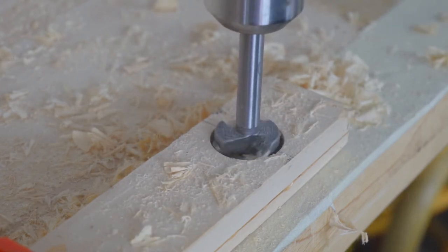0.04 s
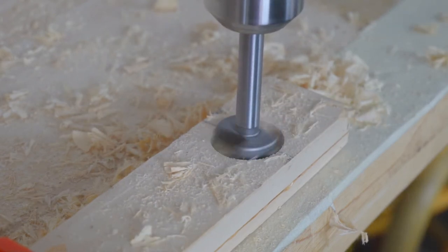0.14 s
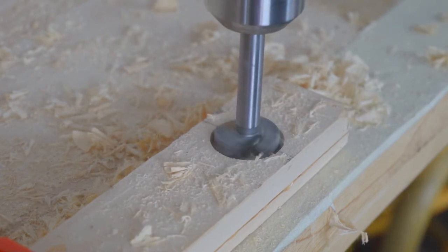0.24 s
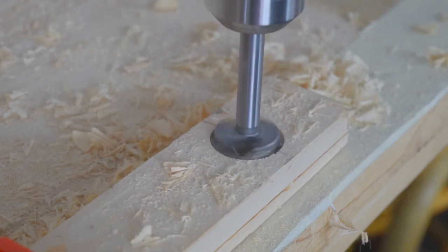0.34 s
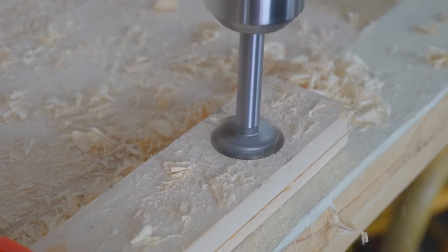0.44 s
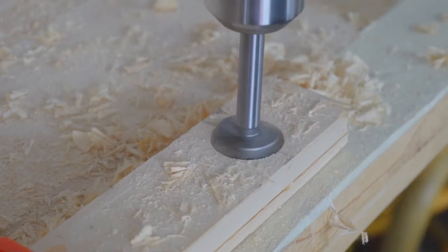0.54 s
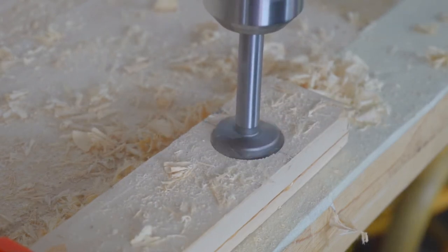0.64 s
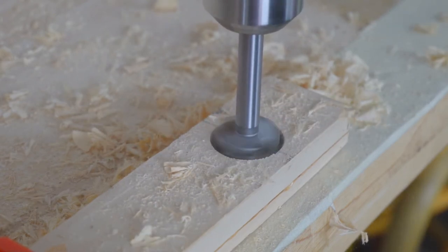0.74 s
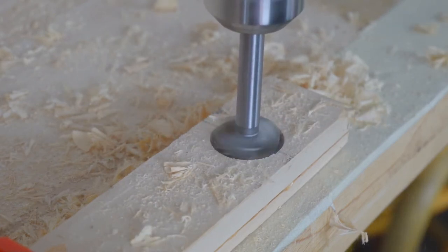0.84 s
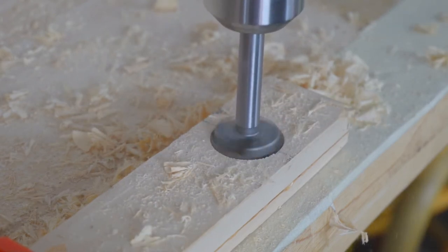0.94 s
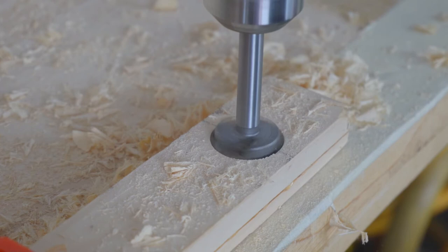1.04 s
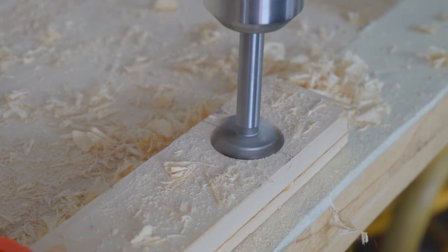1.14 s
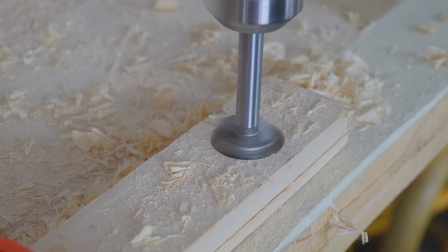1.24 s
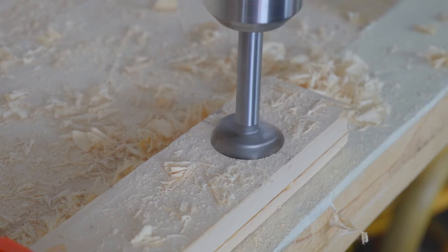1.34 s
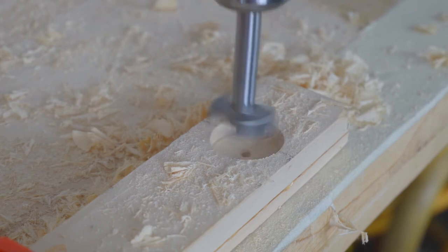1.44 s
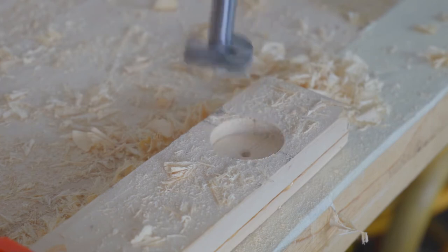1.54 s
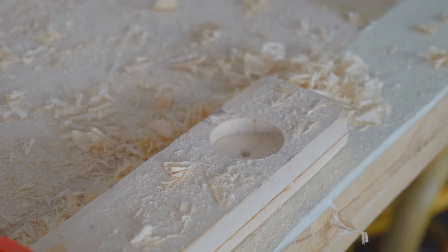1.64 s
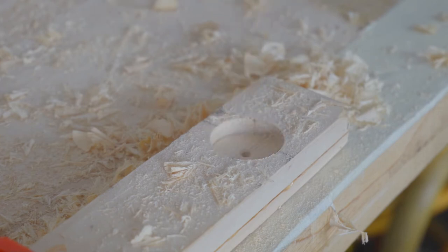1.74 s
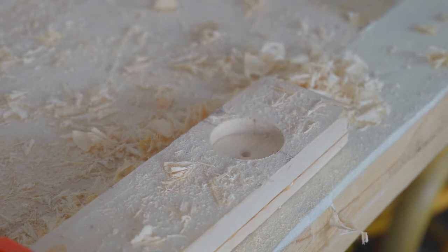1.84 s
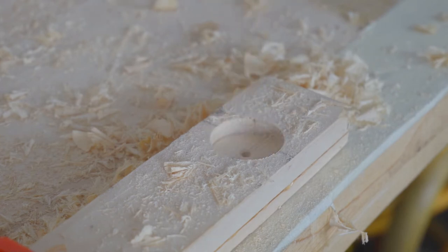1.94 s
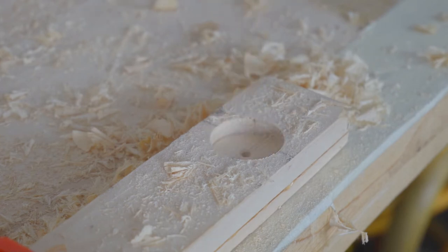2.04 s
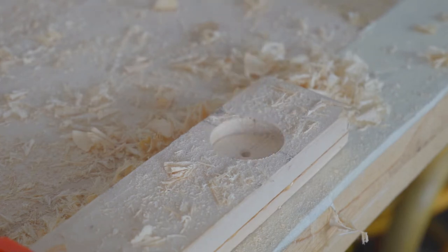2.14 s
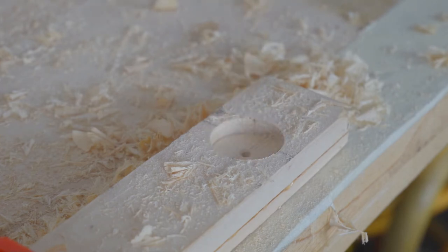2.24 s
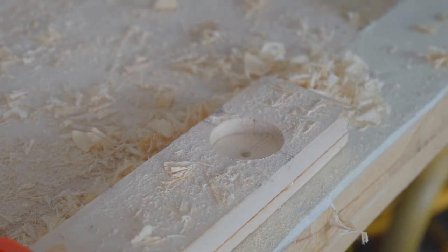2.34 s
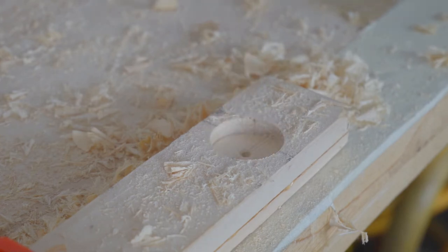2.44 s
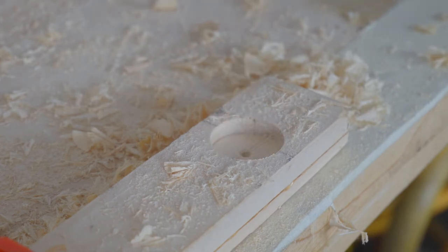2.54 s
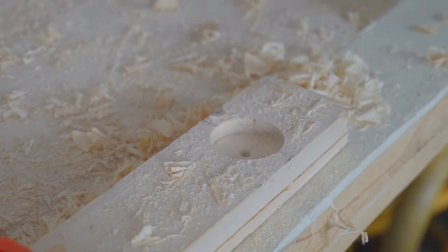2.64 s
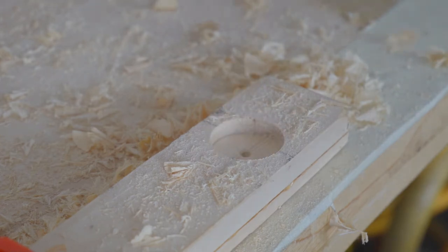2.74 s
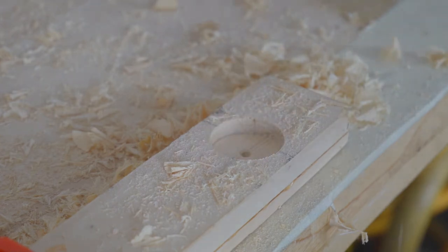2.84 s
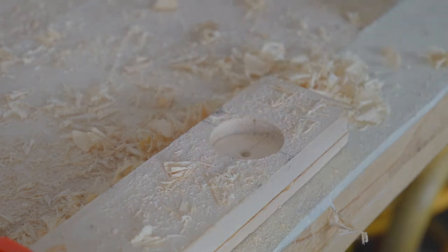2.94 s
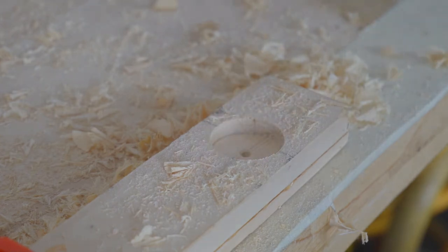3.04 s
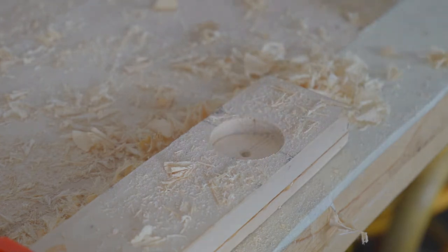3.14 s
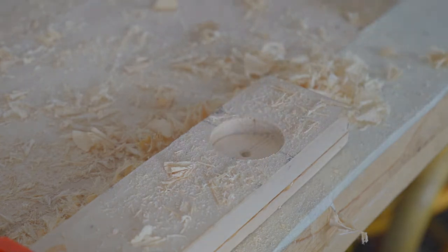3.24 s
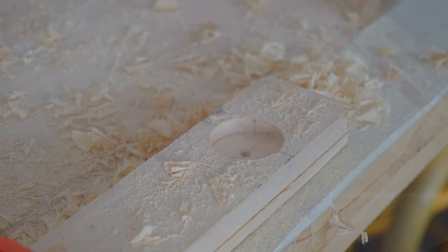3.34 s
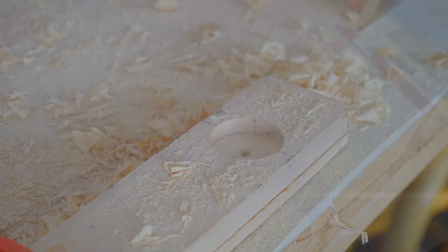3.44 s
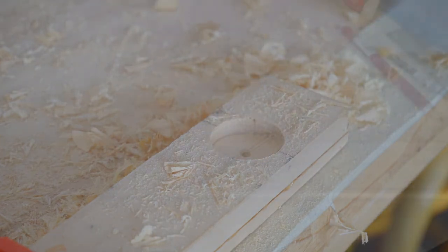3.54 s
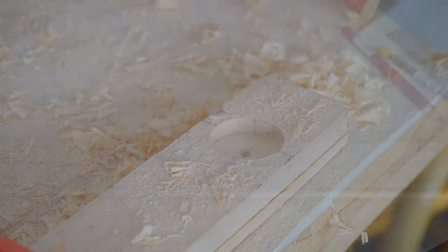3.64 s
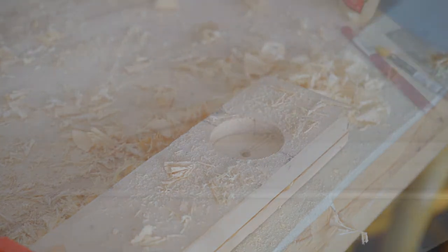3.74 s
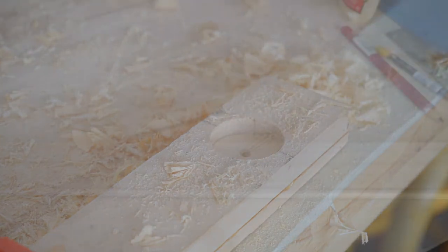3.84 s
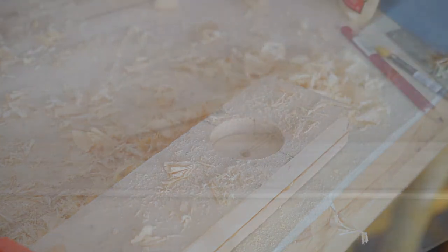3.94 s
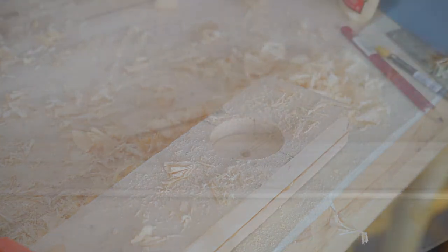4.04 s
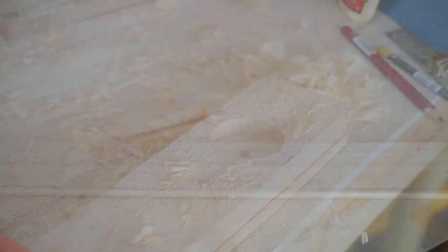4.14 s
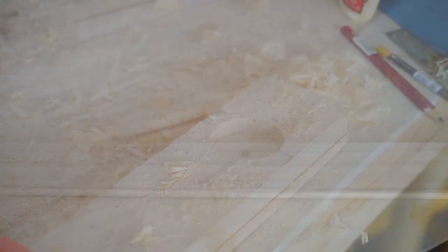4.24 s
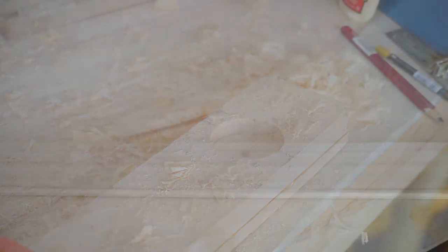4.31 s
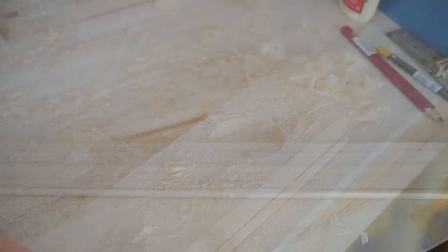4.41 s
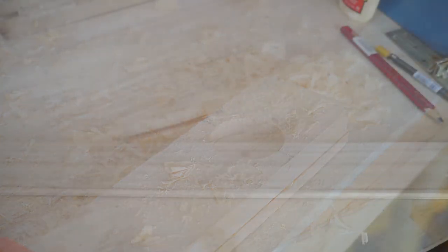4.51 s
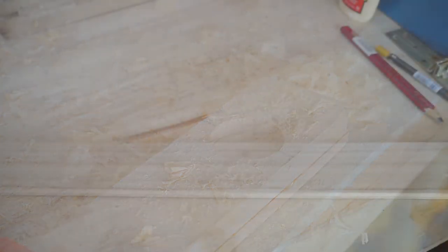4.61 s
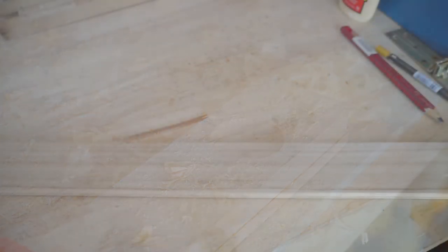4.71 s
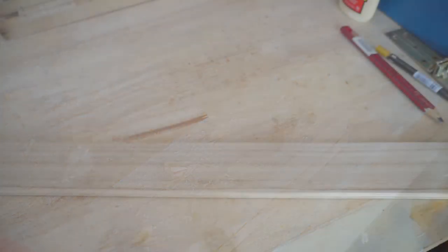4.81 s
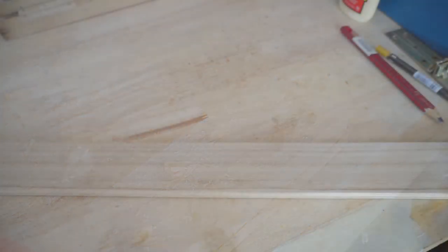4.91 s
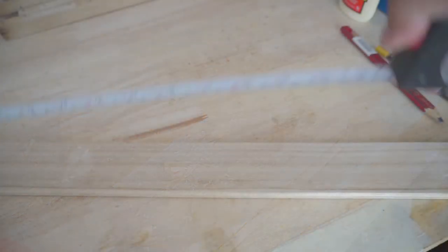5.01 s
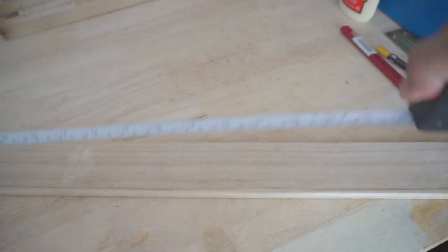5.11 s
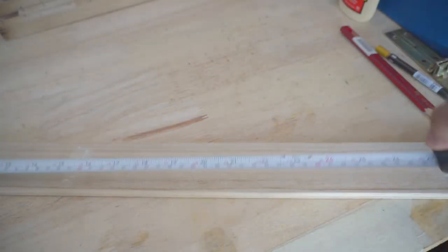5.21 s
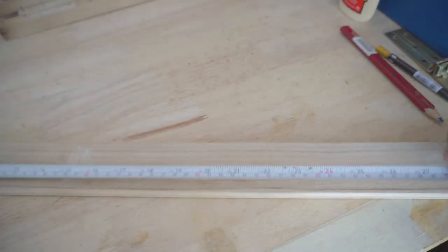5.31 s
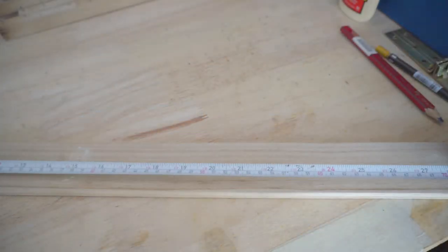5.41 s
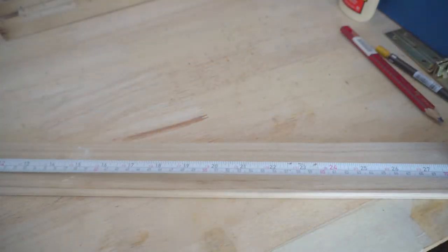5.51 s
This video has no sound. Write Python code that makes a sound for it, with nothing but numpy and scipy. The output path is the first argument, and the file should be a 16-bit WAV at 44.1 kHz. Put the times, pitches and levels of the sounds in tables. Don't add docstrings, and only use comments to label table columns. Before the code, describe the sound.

A close, dry stereo scene in a small workshop. From 0 s a corded drill spins up, its gear whine rising; at about 0.1 s the bit bites and by 0.4 s it bores at full pressure, loud and harsh, with torn wood fibres, gritty gear rattle, a fast hundred-per-second buzz and irregular knocks as the cutter catches. At about 1.45 s the trigger is released: the cutting stops and the whine, rattle and airy fan hiss slide down in pitch and fade until about 3.2 s. Hard wooden knocks with scraping come at 3.02-3.12, 3.24 and 3.46-3.5 s, then faint nudges. A very brief silence at 4.12 s cuts to a quiet, soft hum with a small rustle. From about 4.5 s a steel tape rubs, rattles, chirps and snaps brightly, densest at 4.6-5.0 s, with looser clacks to 5.27 s and faint ticks near 5.5 s.

```python
import sys
import numpy as np
from scipy import signal
from scipy.fft import rfft, irfft, next_fast_len
from scipy.io import wavfile

SR = 44100
rng = np.random.default_rng(int(sys.argv[2]) if len(sys.argv) > 2 else 0)


def invert_db(level):
    return 10 ** (np.asarray(level, dtype=float) / 20)


def store_wav(level_fs):
    pcm = np.round(np.clip(np.atleast_2d(level_fs), -1, 1) * 32767)
    wavfile.write(sys.argv[1], SR, pcm.T.astype(np.int16))


N = 245637

BITE_S, PRESSED_S, RELEASE_S, LAID_S = 0.11, 0.42, 1.444, 3.14
SILENT_FROM_S, SILENT_TO_S = 4.1238, 4.1645
MAINS_HZ, FIRST_JOLT_S, LAST_JOLT_S = 50, .1735, 1.42

# (frequency [Hz], side minus mid [dB])
SIDE_LEVEL = [(60, -18), (110, -22), (200, -22), (380, -17.5), (700, -12), (1290, -9), (2380, -8.5),
              (4400, -7), (8120, -5.5), (15000, -3.5)]
# (time [s], left minus right [dB])
DRILL_PAN = [(0, 0.5), (1.3, -0.1), (1.75, -1), (2.25, -2), (2.75, -.4), (3.2, .3)]
# (time [s], left minus right [dB])
TAPE_DIRECTION = [(4.17, 1.0), (4.45, 0.5), (4.474, -2.5), (4.644, 0), (4.934, -4.5), (5.338, 0.0),
                  (5.57, -1)]

# (time [s], level [dB])
HUM_LEVEL = [(2.9, -45), (3.49, -40), (3.654, -45.5), (3.918, -49), (4.165, -51), (4.445, -49),
             (5.57, -44.5)]
# (frequency [Hz], level [dB])
HUM_SPECTRUM = [(18, -92), (30, -65.5), (81, -22), (164, -21.5), (270, -2), (332, -6.5), (379, -5),
                (897, 0), (1200, -1.5), (1910, -12.5), (4420, -26), (4780, -27), (5170, -27.5),
                (15500, -55)]
# (frequency [Hz], level [dB rms])
LOW_TONES = [(91.5, -67.5), (274.5, -90)]

# (frequency [Hz], width [Hz], level [dB])
BLADE_MODES = [(1910, 350, -5.5), (2540, 120, -7), (3410, 54, -9), (5000, 150, -27), (5310, 48, -17),
               (6070, 48, 5), (8720, 42, -16)]
# (frequency [Hz], level [dB])
BLADE_LOW_SPECTRUM = [(900, -10.5), (1500, -6.5), (2200, -6), (3500, -8), (5000, -10.5), (7000, -27.5)]
# (frequency [Hz], level [dB])
BLADE_HIGH_SPECTRUM = [(3500, -25), (5000, -1.5), (7500, -1.5), (10000, -8.5), (13000, -12), (15800, -11)]
# (time [s], level [dB], treble [dB], rise [s], fall [s])
BLADE_JERKS = [(4.168, -53, 0, 0.012, 0.25), (4.215, -40.5, 2.5, 0.011, 0.063), (4.25, -50, -2, .03, 0.14),
               (4.664, -32, -0.5, 0.091, 0.061), (4.696, -37, 1.5, 0.038, 0.26), (4.81, -40, -2, .03, 0.15),
               (4.862, -39, -1, 0.028, 0.22), (4.95, -37.5, -11, 0.077, 0.28),
               (5.02, -45.5, -4.5, 0.28, 0.099), (5.155, -44.5, -4.5, 0.38, 0.14), (5.2, -53.5, -7, .6, .9),
               (5.268, -52, -6.5, .015, 1.4)]
# (time [s], peak [dB], ring [Hz], upper ring [dB])
BLADE_SNAPS = [(4.2137, -32, 2270, -19), (4.4748, -45, 1490, 6), (4.5365, -35, 1800, -10),
               (4.608, -31, 2030, -10), (4.6515, -22, 2590, 1), (4.661, -25, 1650, 2),
               (4.6887, -21, 2540, 2), (4.7114, -28, 2030, 4), (4.771, -30, 1810, -4),
               (4.8026, -25, 2090, -15), (4.812, -26, 1910, 0), (4.857, -39, 1910, 11),
               (4.94, -32, 1650, -16), (4.954, -27, 1420, -22), (4.9678, -25, 2650, -16),
               (5.012, -28.5, 1830, -6), (5.104, -38, 1260, -8), (5.1316, -34, 2350, -5),
               (5.266, -38, 1500, -7)]
# (time [s], peak [dB])
SETTLING_TICKS = [
    (4.9709, -30),
    (5.1375, -38),
    (5.2662, -42),
    (5.4982, -48),
    (5.5515, -49),
]
# (start [s], end [s], pitch [Hz], level [dB])
BLADE_SQUEALS = [(4.597, 4.63, 2025, -41), (4.644, 4.667, 2640, -41), (4.688, 4.706, 2594, -36),
                 (4.801, 4.825, 1998, -34), (4.85, 4.875, 5100, -44), (4.692, 4.706, 5250, -35),
                 (4.657, 4.674, 6200, -41), (4.715, 4.735, 9700, -50), (4.89, 4.94, 7500, -59),
                 (4.938, 4.95, 1370, -41), (4.963, 4.982, 1410, -43)]
# (multiple of the pitch, level [dB])
SQUEAL_OVERTONES = [(1, -0.5), (2, -16), (3, -11)]

# (time [s], crack peak [dB], bench thud [dB], crack pitch [Hz])
BENCH_KNOCKS = [(3.0231, -5, -20.5, 2370), (3.0328, -21, -23, 1650), (3.0915, -15.5, -28.5, 1580),
                (3.1166, -18, -31, 2050), (3.1978, -29, -51, 3440), (3.238, -7.5, -37, 2290),
                (3.259, -24, -40, 1990), (3.4602, -33, -35, 2750), (3.4654, -25, -30, 2130),
                (3.4748, -18, -47, 2020), (3.4835, -7, -32.5, 2420), (3.4861, -16, -32, 2430),
                (3.4905, -31, -33.5, 2520), (3.5259, -35, -32.5, 1510), (3.6552, -52, -48, 1760),
                (3.8665, -51.5, -66, 2020), (3.96, -40, -55, 1735), (4.068, -44, -62, 1740)]
# (time [s], level [dB])
BIT_TICKS = [
    (3.2377, -34),
    (3.2687, -37),
]
# (frequency [Hz], level [dB], T60 [s])
BENCH_MODES = [(430, 0.5, 0.042), (497, -4, 0.038), (644, -1, 0.038), (743, -4.5, 0.066),
               (798, -4.5, 0.095), (920, -9, 0.1), (997, -16, 0.069), (1170, -12, 0.066),
               (1535, -11, 0.069)]
# (time [s], level [dB])
WEIGHT_THUMPS = [
    (3.0225, -28),
    (3.0432, -34),
    (3.0846, -35),
    (3.1053, -36),
    (3.2385, -37),
    (3.2592, -41),
    (3.4206, -50),
    (3.462, -32),
    (3.4827, -37),
    (3.524, -43),
]
# (frequency [Hz], level [dB], T60 [s])
BENDING_MODES = [(144.5, -4, 0.23), (248, -4, 0.2), (296, -8, 0.13)]
# (time [s], level [dB], rise [s], fall [s])
SLIDE_STROKES = [
    (3.038, -25.5, 0.0066, 0.091),
    (3.094, -30.5, 0.016, 0.13),
    (3.2, -43.5, 0.39, 0.4),
    (3.27, -45.5, .01, 0.4),
    (3.49, -33, 0.053, 0.053),
    (3.607, -40, 0.18, 0.096),
    (3.87, -60, .03, 0.12),
    (3.966, -65, .06, .2),
    (4.066, -66, .01, 0.15),
]
# (frequency [Hz], level [dB])
SLIDE_SPECTRUM = [(600, -24), (1500, -7.5), (3000, -4.5), (6500, -10.5), (9000, -23), (15500, -28)]

# (time [s], rate [Hz])
MESH_RATE = [(0, 1580), (.22, 2970), (.42, 4270), (.56, 4580), (1.0, 4530), (1.42, 4570), (1.616, 4065),
             (1.8, 3675), (2.35, 2450), (2.7, 1690), (3.3, 620)]
# (multiple of the mesh rate, level [dB])
MESH_ORDERS = [(1, 0), (2, -1), (3, -2.5), (4, -8), (5, -8), (6, -12), (7, -18), (8, -22)]
# (start [s], end [s], level [dB], rise [s], fall [s])
MESH_WHINES = [
    (.1, .225, -33, .15, .15),
    (.26, .42, -38, .3, .5),
    (.45, 1.4, -44, .3, .5),
    (1.55, 1.97, -37.5, .6, .3),
    (2.13, 2.33, -38, .3, .35),
    (2.54, 2.63, -47, .4, .3),
    (2.72, 2.84, -43, .3, .15),
]
# (start [s], end [s], level at start [dB], level at end [dB])
MAGNETIC_PULL = [
    (.565, .84, -32, -32),
    (.86, 1.42, -39, -33),
]
# (multiple of the mesh rate, level [dB])
SLOT_ORDERS = [(5 / 3, 0), (4 / 3, 4), (1 / 3, -2)]
# (frequency [Hz], level [dB])
HOUSING_RADIATION = [(1500, -8), (2250, -9), (2600, 0), (4300, 0), (4800, -12), (6800, -14), (7600, 0),
                     (8300, -3), (9100, -7), (10100, -5), (11400, -5), (12300, -8), (13600, -5),
                     (14600, -4), (15600, -1)]
# (time [s], centre [Hz])
WHIRR_PITCH = [(0, 749.7), (.6, 919.6), (1.4, 925), (2.1, 963.7), (2.3, 740), (3.0, 616)]
# (time [s], rate [Hz])
SHAFT_RATE = [(0, 91.4), (.12, 124), (.26, 105), (.38, 124.4), (.6, 142.5), (1.3, 136)]
# (time [s], level [dB])
DRILL_EFFORT = [(0, -33), (.12, -26), (.42, -22), (1.3, -21.5), (1.55, -24.5), (1.9, -25), (2.22, -31),
                (2.32, -30), (2.4, -33), (3.0, -38.5), (3.3, -59)]
# (frequency [Hz], level [dB])
GEARBOX_SPECTRUM = [(1200, -51), (2200, -3.5), (2800, -1.5), (4200, -1), (5500, -3.5), (7500, -7.5),
                    (9000, -16), (12000, -26)]
# (frequency [Hz], width [Hz], level [dB])
HOUSING_MODES = [(2954, 56, 1.3), (3310, 38, 4.9), (3780, 100, 3), (4154, 15, 11), (6245, 53, 13.8),
                 (8970, 230, 5.4)]
# (start [s], end [s], pitch [Hz], width [Hz], level [dB])
RINGING_GLINTS = [(0.18, .34, 4050, 120, -33), (0.33, 0.5, 3950, 130, -33), (.55, .62, 3900, 100, -34),
                  (.42, 0.66, 2000, 120, -32.5), (0.53, .59, 1420, 50, -28.5), (.7, .75, 1300, 37, -28),
                  (.56, 0.78, 1200, 25, -33), (.98, 1.16, 1400, 120, -30.5), (.99, 1.08, 1200, 27, -34.5),
                  (1.03, 1.09, 2700, 44, -32.5), (1.17, 1.2, 2200, 80, -33), (1.28, 1.4, 1950, 53, -29.5),
                  (1.42, 1.5, 1100, 17, -31.5), (1.65, 2.15, 6280, 180, -31), (1.82, 1.87, 5700, 150, -39),
                  (1.8, 1.95, 2950, 160, -34), (1.93, 1.99, 3300, 60, -33), (2.03, 2.07, 3600, 90, -37),
                  (2.0, 2.1, 950, 90, -33.5), (2.31, 2.345, 8800, 150, -43), (2.47, 2.53, 4300, 90, -42),
                  (2.54, 2.6, 3450, 64, -35.5), (2.59, 2.65, 3750, 70, -41), (2.55, 3.43, 1850, 53, -44.5),
                  (2.1, 3.14, 3150, 350, -38), (2.97, 3.03, 3300, 120, -41), (0.62, .88, 1100, 34, -34.5),
                  (.84, .94, 910, 25, -36), (.49, 0.66, 1450, 55, -29.5), (.71, .76, 2080, 50, -29.5),
                  (2.7, 3.02, 9300, 100, -55), (2.4, 2.5, 6800, 120, -58)]
# (frequency [Hz], level [dB])
FAN_SPECTRUM = [(5000, -2), (7500, 3.5), (8500, -1), (10000, -5.5), (12500, -8), (14000, -15.5),
                (16000, -21.5)]

# (frequency [Hz], level [dB per Hz])
CUTTER_SPECTRUM = [(250, -36.5), (500, -12.5), (900, -4.5), (1400, -4), (2300, -3.5), (3000, -8),
                   (5000, -32)]
# (frequency [Hz], width [Hz], level [dB])
WOOD_MODES = [(1200, 30, 4.5), (1360, 36, 5.4), (1490, 60, 8), (1712, 73, 0.92), (1907, 84, 5.6),
              (2170, 72, 7.1), (2390, 12, 3.1), (2540, 49, 2.4)]
# (frequency [Hz], level [dB])
BENCH_SPECTRUM = [(30, -37), (120, -25.5), (185, -17.5), (250, -8), (290, -7), (345, -8.5), (410, 0),
                  (550, -8.5), (700, -7.5), (1000, -40)]
# (time [s], peak [dB], ring [Hz])
STRONG_JOLTS = [(0.1134, -19, 2280), (0.133, -17, 2420), (0.153, -17, 2550), (0.173, -18, 2670),
                (0.1937, -10, 2800), (0.2134, -10, 2900), (0.2134, -11, 1600), (0.2545, -16, 2720),
                (0.3262, -13, 1670), (0.3378, -15.5, 1860), (0.356, -12.5, 1940), (0.3882, -11.5, 1220),
                (0.41, -12, 1200), (0.4319, -9.5, 2170), (0.4506, -11.5, 2280), (0.4728, -11, 2160),
                (0.4925, -10, 2190), (0.5125, -6.5, 2170), (0.5324, -11, 2150), (0.5522, -12, 1420),
                (0.5643, -10, 1360), (0.5938, -12.5, 2210), (0.6169, -13, 1230), (0.6728, -10.5, 1380),
                (0.6935, -11.5, 2100), (0.7185, -9, 2070), (0.7928, -14, 2180), (0.8131, -12.5, 2600),
                (0.8387, -8.5, 2320), (0.9117, -11.5, 2390), (0.933, -13, 1490), (0.954, -15, 1490),
                (0.998, -7.5, 1360), (1.0322, -11, 1460), (1.0535, -11, 1420), (1.0926, -13, 2570),
                (1.153, -11.5, 1860), (1.1729, -9.5, 1470), (1.1934, -8, 2190), (1.2134, -13, 2190),
                (1.2323, -11, 2390), (1.253, -12.5, 2250), (1.2727, -9, 2160), (1.2977, -12, 2090),
                (1.3336, -9, 2180), (1.352, -11.5, 1393), (1.373, -6.5, 2531), (1.4141, -14, 1230),
                (1.4476, -15, 1190), (1.469, -14.5, 1210)]


def rms_one(x):
    return x / np.sqrt(np.mean(x ** 2) + 1e-20)


def in_time(rows):
    s, *columns = np.transpose(rows)
    return [np.interp(np.arange(N) / SR, s, c) for c in columns]


def at_hz(points, hz):
    return np.interp(np.log(hz), np.log(np.array(points)[:, 0]), np.array(points)[:, 1])


def held(start, end, rise_s, fall_s):
    corners = [start - 4 * rise_s, start, end, end + 4 * fall_s]
    return np.interp(np.arange(N) / SR, corners, [-120, 0, 0, -120])


def drift(rate, size=N):
    r = np.exp(-32 * np.pi * rate / SR)
    noise = rng.standard_normal(size // 16 + 2002)
    slow = signal.lfilter([1], [1, -2 * r, r * r], noise)[2000:]
    slow = slow / np.sqrt((1 + r * r) / (1 - r * r) ** 3)
    return np.interp(np.arange(size) / 16, np.arange(len(slow)), slow)


def high_pass(x, order, hz):
    return signal.sosfilt(signal.butter(order, hz, "high", fs=SR, output="sos"), x)


def band_pass(x, order, edges):
    return signal.sosfilt(signal.butter(order, edges, "band", fs=SR, output="sos"), x)


def grit(per_s, uneven_db):
    sizes = invert_db(uneven_db * np.minimum(rng.exponential(1, (2, N)), 5)) * rng.standard_normal((2, N))
    return sizes * (rng.random((2, N)) < per_s / SR)


def body(streams, spectrum, peaks=(), lift_db=0.):
    size = next_fast_len(N)
    hz = np.fft.rfftfreq(size, 1 / SR) + 1
    below = np.minimum(hz / spectrum[0][0], 1) ** 2
    gain = invert_db(at_hz(spectrum, hz)) * below
    modes = sum(invert_db(db + lift_db) / (1 + (2 * (hz - at) / width) ** 2) for at, width, db in peaks)
    gain = gain * (1 + modes)
    side_gain = gain * invert_db(at_hz(SIDE_LEVEL, hz))
    mid, side = irfft(rfft(streams, size) * [gain, side_gain], size)[:, :N]
    return rms_one(np.array([mid + side, mid - side]))


def ring(x, hz, t60):
    r, w = invert_db(-60 / (t60 * SR)), 2 * np.pi * hz / SR
    return signal.lfilter([0, np.sin(w)], [1, -2 * r * np.cos(w), r * r], x + 1e-18)


def burst(t60, hz, width_oct, rise_s):
    t = np.arange(SR // 8) / SR
    edges = np.clip(hz * 2.0 ** (np.array([-1, 1]) * width_oct), 50, .45 * SR)
    noise = rng.standard_normal(len(t)) * invert_db(-60 * t / t60) * np.minimum(t / rise_s, 1)
    noise = band_pass(noise, 2, edges)
    return noise / np.abs(noise).max()


def gliding(hz, spread):
    phase = 2 * np.pi * np.cumsum(hz) / SR
    return spread[0] * np.cos(phase) + spread[1] * np.sin(phase)


def add(out, s, piece):
    i = round(s * SR)
    out[i:i + len(piece)] += piece[:N - i]


def workshop(x):
    t = np.arange(SR // 2) / SR
    tail = rng.standard_normal((2, len(t))) * invert_db(-60 * t / 0.15) * (t > .004)
    tail = band_pass(tail, 3, [600, 6000])
    tail /= np.sqrt(np.sum(tail ** 2, axis=1, keepdims=True))
    return signal.fftconvolve(x[None], tail, axes=1)[:, :N]


def hum():
    t = np.arange(N) / SR
    level = invert_db(in_time(HUM_LEVEL)[0] + .9 * drift(11))
    tones_sum = sum(invert_db(db - 7 + 2 * drift(3.7)) * np.sin(2 * np.pi * hz * t) for hz, db in LOW_TONES)
    pause = invert_db(-14 * invert_db(held(4.55, 4.86, 0.11, .1)))
    return level * body(rng.standard_normal((2, N)), HUM_SPECTRUM) + tones_sum * pause * (t > SILENT_TO_S)


def blade_friction():
    full_s = 4.53
    run = invert_db(-39 + held(full_s, 4.756, .16, .5)) * (np.arange(N) > 4.478 * SR)
    jerks = [invert_db(db + held(s, s, rise, fall)) for s, db, _, rise, fall in BLADE_JERKS]
    low = np.max([run] + jerks, axis=0)
    run_high = run * invert_db(-8 + held(full_s, 9, .12, 1))
    jerks_high = [jerk * invert_db(row[2]) for jerk, row in zip(jerks, BLADE_JERKS)]
    high = np.max([run_high] + jerks_high, axis=0)
    crackle = invert_db(0.72 * drift(40))
    out = low * crackle * body(grit(6000, 0.92), BLADE_LOW_SPECTRUM, BLADE_MODES, lift_db=1.0)
    return out + high * crackle * body(grit(12000, 1.5), BLADE_HIGH_SPECTRUM, BLADE_MODES, lift_db=0.0)


def squeaks():
    out = np.zeros(N)
    for start, end, hz, db in BLADE_SQUEALS:
        n = int((end - start) * SR)
        turns = np.cumsum(hz * (1 + .04 * drift(150, size=n))) / SR
        edge = np.minimum(np.minimum(np.arange(n), n - np.arange(n)) / (.002 * SR), 1)
        squeal = np.zeros(n)
        for k, k_db in SQUEAL_OVERTONES:
            if k * hz < 11000:
                squeal += invert_db(db + 3 + k_db + 2.5 * drift(200, size=n)) * np.sin(2 * np.pi * k * turns)
        add(out, start, edge * squeal)
    return out


def snaps():
    out, t60 = np.zeros(N), 0.052
    for s, db, hz, upper_db in BLADE_SNAPS:
        upper = invert_db(upper_db) * burst(1.2 * t60, 2.13 * hz, 0.27, 0.0014)
        add(out, s, invert_db(db - 6.5) * (burst(t60, hz, 0.084, 0.0021) + upper))
    for s, db in SETTLING_TICKS:
        add(out, s, invert_db(db - 2.5) * burst(.02, 4000, .5, .0005))
    return out


def sliding():
    stroke_db = np.max([db + held(s, s, rise, fall) for s, db, rise, fall in SLIDE_STROKES], axis=0)
    return invert_db(stroke_db) * body(grit(13000, 1.3), SLIDE_SPECTRUM)


def thumps():
    push, pad = np.zeros(N), np.hanning(round(.002 * SR))
    for s, db in WEIGHT_THUMPS:
        add(push, s, invert_db(db) * pad / pad.sum())
    bend = sum(invert_db(db) * ring(push, hz, t60) for hz, db, t60 in BENDING_MODES)
    return high_pass(bend, 3, 120)


def knocks():
    out, push, tick = np.zeros((3, N))
    t60, steel_hz = 0.035, 13420
    for s, db, thud_db, hz in BENCH_KNOCKS:
        dull_db = .18 * (db + 8)
        crack = burst(t60, hz, .38, .0012)
        crack = crack + invert_db(-13 + dull_db) * burst(.45 * t60, 6000, .8, .0006)
        click = invert_db(-10.5 + dull_db) * burst(.007, 3600, .6, .0003)
        add(out, s, invert_db(db - 3.5) * (crack + click))
        add(push, s, invert_db(thud_db - 22.5) * burst(0.082, 870, 1.96, 0.001))
    steel_blows = BIT_TICKS + [(s, db - 43.5) for s, db, *_ in BENCH_KNOCKS]
    for s, steel_db in steel_blows:
        add(tick, s, invert_db(steel_db - 18) * burst(0.012, steel_hz, 0.16, 0.0026))
    out += sum(invert_db(db) * ring(push, hz, t60) for hz, db, t60 in BENCH_MODES)
    out += invert_db(1.5) * band_pass(push, 2, [150, 900])
    return out + ring(tick, steel_hz, .028)


def shaft():
    whirr_db = -33.5 + held(0.31, 1.91, 0.57, 1.53)
    free, loaded = 0.91, 0.3
    wide = free + (loaded - free) * invert_db(held(PRESSED_S + 0.14, RELEASE_S, 0.26, 0.61))
    broad, narrow = np.sqrt(np.clip(wide, 0, 1)), np.sqrt(np.clip(1 - wide, 0, 1))
    spread = [broad * drift(210) + narrow * drift(22) for _ in range(2)]
    whirr = high_pass(gliding(in_time(WHIRR_PITCH)[0], spread), 2, 400)
    steady_db = -60.5 + held(BITE_S, RELEASE_S - .15, 0.18, 0.35)
    wobble_db = -47 + held(0.37, 0.53, 0.34, 0.51)
    thrum_db = np.maximum(steady_db, wobble_db) + 0.5 + 3.7 * drift(22)
    thrum = invert_db(thrum_db) * np.sin(2 * np.pi * np.cumsum(in_time(SHAFT_RATE)[0]) / SR)
    windings_db = -60 + held(PRESSED_S + .1, RELEASE_S - .1, 0.9, .17)
    windings = gliding(np.full(N, 72.), [drift(27), drift(17)])
    return invert_db(whirr_db) * whirr + thrum + invert_db(windings_db) * windings


def glints():
    out = np.zeros((2, N))
    for start, end, hz, width, db in RINGING_GLINTS:
        i, n = int(start * SR), int((end - start) * SR)
        tone = np.sin(2 * np.pi * np.cumsum(hz + .6 * width * drift(width, size=n)) / SR)
        patches_db = 2.5 + 2.5 * drift(60, size=n) + 1.2 * drift(18, size=n) * np.array([[1], [-1]])
        swell = np.sin(np.pi * np.arange(n) / n)
        out[:, i:i + n] += invert_db(db + patches_db) * swell * tone
    return out


def backlash():
    teeth = 24.5
    turns = np.cumsum(in_time(MESH_RATE)[0] * (1 + .08 * drift(30))) / SR / teeth
    return 1 + .35 * invert_db(held(RELEASE_S + .35, 2.1, .4, .8)) * np.cos(2 * np.pi * turns)


def tones(orders, overtones_db, wobble, rough_db):
    rate = in_time(MESH_RATE)[0] * (1 + wobble * drift(64.0))
    turns, out = np.cumsum(rate) / SR, np.zeros((2, N))
    for k, db in orders:
        level_db = db + 5.5 + at_hz(HOUSING_RADIATION, k * rate) + overtones_db * (k > 1)
        level_db = level_db + rough_db * drift(23)
        lean = invert_db(2.0 * drift(4.0) * np.array([[1], [-1]]))
        out += lean * (k * rate < 16500) * invert_db(level_db) * np.sin(2 * np.pi * k * turns)
    return out


def whine():
    t = np.arange(N) / SR
    mesh_db = np.max([db + held(a, b, rise, fall) for a, b, db, rise, fall in MESH_WHINES], axis=0)
    mesh_db = mesh_db + held(0, LAID_S, 1, .12)
    overtones_db = np.maximum(held(.7, 9, .45, 1), -25)
    overtones_db -= 8 * invert_db(held(2.15, 2.33, .5, .6))
    mains = np.cos(2 * np.pi * MAINS_HZ * (t - FIRST_JOLT_S - .003))
    pulsing = 1 + .9 * (t < RELEASE_S) * mains
    out = invert_db(mesh_db) * pulsing * tones(MESH_ORDERS, overtones_db, wobble=.003, rough_db=1.8)
    sing_db = -43 + held(.78, 1.15, .4, 1.5) + held(0, RELEASE_S, 1, .05)
    out += invert_db(sing_db) * tones([(3, 0)], 0, wobble=.001, rough_db=2.0)
    pull = np.zeros(N)
    for a, b, db, end_db in MAGNETIC_PULL:
        pull += invert_db(np.interp(t, [a, b], [db, end_db]) + held(a, b, .02, .02))
    return out + pull * tones(SLOT_ORDERS, 0, wobble=.0012, rough_db=1.8)


def jolts():
    out, shapes = np.zeros(N), []
    for _ in range(40):
        knock = burst(.016, 2250 * 2 ** rng.normal(0, .12), .3, .0006)
        low = invert_db(-5) * burst(.035, 1250, .35, .0012)
        high = invert_db(-3.5) * burst(0.017, 4500, 0.69, 0.00082)
        shapes.append(knock + low + high)
    for k, s in enumerate(np.arange(FIRST_JOLT_S, LAST_JOLT_S, .5 / MAINS_HZ)):
        strength_db = -19 + 3 * s - 6 * (k % 2) + 1.5 * rng.standard_normal()
        add(out, s, invert_db(strength_db) * rng.choice([-1, 1]) * shapes[rng.integers(len(shapes))])
    return out


def chatter():
    out, n = np.zeros((2, N)), 2 * SR
    for hz, width, db in WOOD_MODES:
        tone = gliding(np.full(n, hz), [drift(0.59 * width, size=n), drift(1.2 * width, size=n)])
        flare_db = 2.2 * drift(20, size=n) + 2.1 * drift(32, size=n) * np.array([[1], [-1]])
        out[:, :n] += invert_db(db - 11.5 + flare_db) * tone
    return invert_db(-33 + held(PRESSED_S, RELEASE_S, .2, .22)) * out


def strong_jolts():
    out = np.zeros(N)
    for s, db, hz in STRONG_JOLTS:
        upper = invert_db(-8.0) * burst(.015, 2 * hz, 0.74, 0.00074)
        add(out, s, invert_db(db - 4) * (burst(.022, hz, 0.18, .001) + upper))
    return out


def drill():
    t, rate = np.arange(N) / SR, in_time(MESH_RATE)[0]
    gearbox = invert_db(in_time(DRILL_EFFORT)[0] + held(0, DRILL_EFFORT[-1][0], 1, 0.33))
    fan = gearbox * invert_db(-4 + 6.5 * np.log2(rate / rate.max()) + held(BITE_S, 9, .62, 1))
    idle_db = -37.5
    cut_db = np.maximum(-24.5 + held(BITE_S, RELEASE_S - .1, 0.36, 2.36), idle_db)
    cutter = invert_db(cut_db + held(0, LAID_S, 1, 0.49))
    bench = cutter * invert_db(-10 - 6.5 * np.minimum(t, RELEASE_S) + 1.5 * drift(8.0))
    bite = invert_db(0.84 * drift(23))
    clack = backlash()
    rattle = gearbox * bite * clack * invert_db(0.74 * drift(5.0))
    out = cutter * bite * body(grit(9000, 2.6), CUTTER_SPECTRUM, WOOD_MODES, lift_db=-11.5)
    out += rattle * body(grit(16000, 1.5), GEARBOX_SPECTRUM, HOUSING_MODES, lift_db=-5.0)
    out += fan * invert_db(0.89 * drift(17)) * body(grit(22000, 2.9), FAN_SPECTRUM)
    out += bench * body(rng.standard_normal((2, N)), BENCH_SPECTRUM)
    return out + shaft() + chatter() + clack * glints() + whine()


def scene():
    halves = np.array([[.5], [-.5]])
    hits, tape = knocks() + jolts() + strong_jolts(), snaps() + squeaks()
    tool = drill() * invert_db(in_time(DRILL_PAN)[0] * halves)
    after_change = np.arange(N) > SILENT_TO_S * SR
    lean = invert_db(in_time(TAPE_DIRECTION)[0] * after_change * halves)
    room = workshop(invert_db(-10.5) * hits + invert_db(-13) * tape)
    near = tape + sliding() + blade_friction() + hum()
    return tool + hits + thumps() + room + lean * near


def roll_off(x):
    return signal.sosfilt(signal.butter(12, 16730, fs=SR, output="sos"), x)


def record(dry):
    t = np.arange(N) / SR
    kept = np.clip((SILENT_FROM_S - t) / .001, 0, 1) + (t > SILENT_TO_S)
    x = high_pass(0.86 * np.tanh(dry / 0.95), 2, 70)
    x = signal.sosfilt(signal.cheby2(18, 60, 16150, fs=SR, output="sos"), x)
    return roll_off(x * kept)


dry = scene()
out = record(dry)
store_wav(out)
```